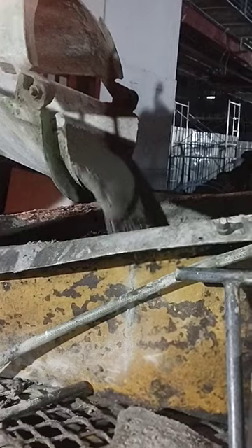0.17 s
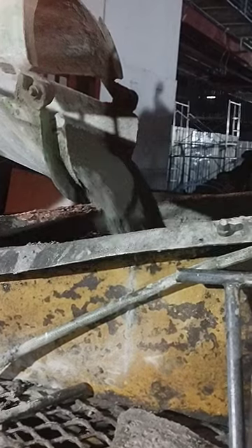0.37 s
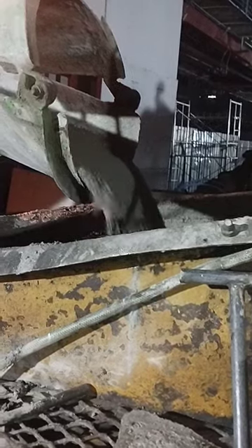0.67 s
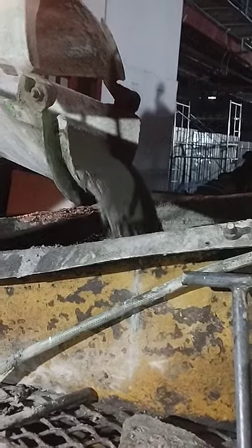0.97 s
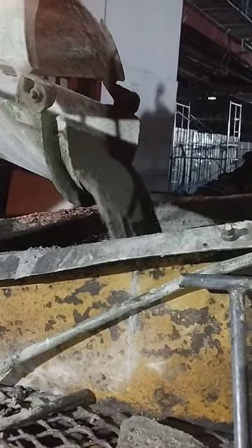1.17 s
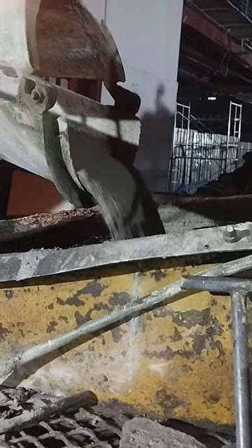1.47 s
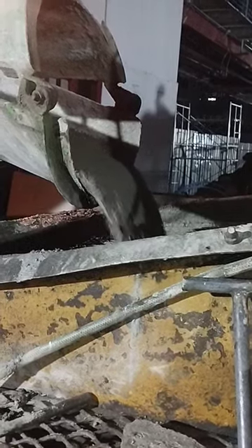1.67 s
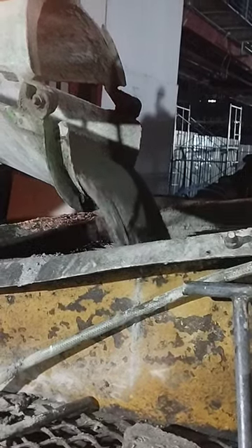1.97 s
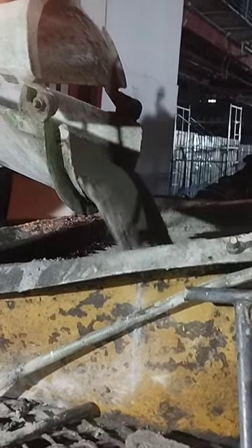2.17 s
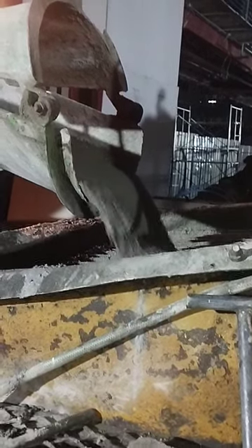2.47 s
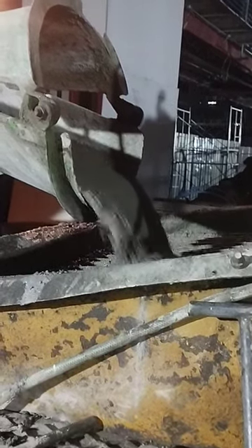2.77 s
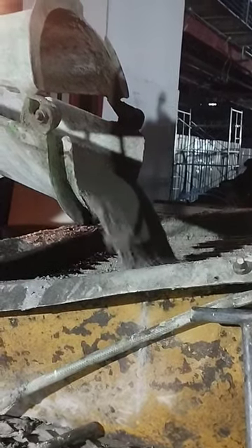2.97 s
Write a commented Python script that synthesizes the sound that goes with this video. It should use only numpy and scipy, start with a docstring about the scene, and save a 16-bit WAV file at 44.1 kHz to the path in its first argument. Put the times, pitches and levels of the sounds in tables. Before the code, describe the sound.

Loud diesel engine drone with pump hum and whine, interrupted by dull steel thuds and wet spatter.

```python
"""A loaded diesel throbs and knocks over pump hum and whine; heavy thuds break in, with wet spatter behind.
A six-cylinder diesel drives a nine-piston hydraulic pump beside a steel hopper fed with wet concrete.
Mid-way the stroke ends: load drops, the engine runs up, the valve thuds over, then pressure builds again.
Exhaust and pump are sine tones locked to the firings; knock, casing and hopper are struck ringing modes;
roar and hiss are filtered noise, slurry is dense clicks. A phone microphone holds the loud moments down."""
import sys
import numpy as np
from scipy import signal
from scipy.io import wavfile
from scipy.ndimage import uniform_filter1d

SR = 44100
rng = np.random.default_rng(int(sys.argv[2]) if len(sys.argv) > 2 else 0)


def transcribe(u):
    """Save the signal u as a 16-bit wav file named by the first command-line argument.

    u: samples, shape (n,) or (channels, n), limited to [-1, 1]; the rate is SR.
    q: integer samples, one column per channel.
    """
    v = np.clip(np.atleast_2d(u).T, -1, 1)
    q = np.round(v * 32767).astype(np.int16)
    wavfile.write(sys.argv[1], SR, q)


N = 137592
T = np.arange(N) / SR   # time [s]


def amp(db):
    """Decibels to a linear factor."""
    return 10 ** (np.asarray(db) / 20)


def rms_one(x):
    """Scale to an rms of 1."""
    return x / np.sqrt(np.mean(x ** 2) + 1e-20)


def in_time(rows):
    """Draw straight lines between timed rows, giving one curve per column."""
    s, *columns = np.transpose(rows)
    return [np.interp(T, s, c) for c in columns]


def at_hz(points, hz):
    """Read a (frequency, value) curve on a logarithmic frequency axis."""
    point_hz, values = np.transpose(points)
    return np.interp(np.log(hz), np.log(point_hz), values)


def drift(rate_hz):
    """Slow chance of spread 1: low-passed noise, made on every 40th sample."""
    r = np.exp(-80 * np.pi * rate_hz / SR)
    noise = rng.standard_normal(N // 40 + 2002)
    slow = signal.lfilter([1], [1, -2 * r, r * r], noise)[2000:]   # skip the filter's run-in
    return np.interp(np.arange(N) / 40, np.arange(len(slow)), rms_one(slow))


def ring(clicks, hz, t60):
    """A mode as a two-pole filter: a unit click starts a sine of height 1 that falls 60 dB in t60 seconds."""
    r, w = amp(-60 / (t60 * SR)), 2 * np.pi * hz / SR
    return signal.lfilter([0, np.sin(w)], [1, -2 * r * np.cos(w), r * r], clicks + 1e-18)


def push(clicks, seconds):
    """A soft contact: each click is spread over a smooth hump."""
    hump = np.hanning(int(seconds * SR))
    return signal.fftconvolve(clicks, hump / hump.sum())[:N]


def resonance(x, hz, width_hz):
    """A two-pole band-pass with about unit gain at its centre."""
    r = np.exp(-np.pi * width_hz / SR)
    return signal.lfilter((1 - r * r) / 2 * np.array([1, 0, -1]),
                          [1, -2 * r * np.cos(2 * np.pi * hz / SR), r * r], x)


def later(left, lead_rad, hz):
    """Delay the left signal by a phase lead at hz, to serve as the right."""
    return np.interp(T - lead_rad / (2 * np.pi * hz), T, left)


def firings():
    """Engine speed summed into a running count of firings, zero at the first knock."""
    first_knock_s = .331
    # firing rate as the engine runs up and settles: (time [s], rate [Hz])
    speed = [(.2, 50.7), (.85, 50.75), (1.0, 53.0), (1.2, 53.6), (1.45, 53.0), (1.65, 52.2), (1.78, 51.3),
             (2.2, 51.0), (2.6, 50.85), (3.12, 50.85)]
    count = np.cumsum(in_time(speed)[0]) / SR
    return count - np.interp(first_knock_s, T, count)


def tones(table, count, level_db):
    """Sines locked to the firings, at multiples rounded to thirds, wavering a little in level and phase."""
    waver_db, waver_rad = .5, .05   # both grow with the multiple
    out = 0
    for multiple, left_db, right_db, lead in table:
        phase = 2 * np.pi * round(3 * multiple) / 3 * count + waver_rad * multiple * drift(2.64)
        waver = waver_db * min(multiple / 2, 6) * drift(5.8)
        gain = amp(level_db + waver + np.array([[left_db], [right_db]]))
        out = out + gain * np.sqrt(2) * np.sin(phase + np.array([[lead], [0]]))
    return out


def exhaust(count, load_db):
    """Exhaust pulses: low multiples of the firing rate that follow the engine load."""
    # exhaust tones before load: (multiple of firing rate, left rms [dB], right rms [dB], left leads [rad])
    exhaust_tones = [(1, -19, -22.5, 0.54), (2, -15.5, -16.5, -0.51), (4, -26.5, -26, 0),
                     (7, -42, -33, -0.2)]
    return tones(exhaust_tones, count, load_db)


def pump(count, hum_db, whine_db):
    """Pump tones geared to the engine: a piston hum, higher piston whine and a high gear whine, with a level
    curve for the hum and one for the whines."""
    # tones before the level curves: (multiple of firing rate, left rms [dB], right rms [dB], left leads [rad])
    hum_tones = [(3, -18.5, -20.5, -0.18)]
    whine_tones = [(5.9, -21.5, -21.5, 0.21), (8.847, -24, -26, 2.5), (11.9, -27, -29.5, 0.2),
                   (49.86, -41.5, -35.5, 1.5)]
    return tones(hum_tones, count, hum_db) + tones(whine_tones, count, whine_db)


def knock(count, load_db):
    """One cylinder knocks dully, once in six firings: a soft blow into modes that swell before they die."""
    base_db, follows_load, grows_db_per_s = -4, .6, 1.2
    contact_s, swell_t60 = .00094, .012
    # knock modes: (frequency [Hz], relative level [dB], t60 [s])
    knock_modes = [(324, -3, 0.034), (427, -2, 0.026), (459, -6.5, 0.061), (297, -2, 0.047),
                   (1191, -14, 0.038), (380, -7.5, 0.031)]
    blow_db = base_db + follows_load * load_db + grows_db_per_s * (T - T.mean()) + .41 * drift(3.1)
    cycle = np.floor(count / 6)
    blows = push(np.diff(cycle, prepend=cycle[0]) * amp(blow_db), contact_s)
    out = 0
    for k, (hz, db, t60) in enumerate(knock_modes):
        mode = ring(ring(blows, hz, t60) * hz / SR, hz, swell_t60)
        out = out + (-1) ** k * amp(db) * mode * 4   # alternate signs
    return out


def casing(count, roar_db):
    """Every firing strikes the block and casing modes, with uneven timing and strength by cylinder."""
    level_db, strength_spread_db = -24.5, 1.1
    jitter_s, habit_s = .00008, .0012   # timing spread: by strike, by cylinder
    # modes: (frequency [Hz], relative level [dB], t60 [s], left minus right [dB], left leads [rad])
    casing_modes = [(741, 0, 0.17, -4, 1.), (761, 0.5, 0.099, 0, 1.4), (949, 2, 0.18, 3, 1.7),
                    (960, -4, .07, 1, 3.), (1084, -7, 0.056, 9, 3.7), (1179, 3.5, 0.12, -6, 2.27),
                    (1450, 5, 0.15, -1, 3.9), (1580, -4, 0.077, 7, 3.), (1826, 1.5, 0.14, 2.5, 2.5),
                    (2140, -2, 0.095, -12.5, 2), (702, -9, 0.05, 1, 0.39), (891, -8, 0.16, 10, 1.1),
                    (2685, -5, 0.19, -9, 1.7)]
    # strike strength of each cylinder: (relative level [dB])
    strikes_db = [6, 1, -2, -1, -3, -1]
    at = np.flatnonzero(np.diff(np.floor(count)))
    cylinder = np.floor(count[at + 1]).astype(int) % 6
    habit = rng.normal(0, 1, (6, len(casing_modes)))
    chance = rng.normal(0, 1, (len(at), len(casing_modes), 2))
    out = 0
    for k, (hz, db, t60, pan_db, lead) in enumerate(casing_modes):
        shift_s = habit_s * habit[cylinder, k] + jitter_s * chance[:, k, 0]
        place = np.clip(at + (SR * shift_s).astype(int), 0, N - 1)
        clicks = np.zeros(N)
        clicks[place] = amp(db + np.array(strikes_db)[cylinder] + strength_spread_db * chance[:, k, 1])
        left = ring(clicks, hz, t60)
        out = out + np.array([left * amp(pan_db / 2), later(left, lead, hz) * amp(-pan_db / 2)])
    return amp(level_db + roar_db - roar_db.mean()) * rms_one(out)


def valve():
    """Valve thuds: soft heavy blows into the hopper's modes, which swell before they die and judder."""
    favour_db_per_oct, swell_t60, judder_db = 19, .036, 3
    # blows: (time [s], relative level [dB], favoured pitch [Hz])
    thuds = [(.915, -6.5, 183), (.925, -14, 408), (.945, -17.5, 269), (1.068, -18.5, 425),
             (1.109, -21, 250), (1.15, -8.5, 162), (1.19, 3.5, 139), (1.201, -8, 500), (1.215, -7, 270),
             (1.279, -14.5, 320), (1.599, -19, 437)]
    # steel hopper modes: (frequency [Hz], relative level [dB], t60 [s], left leads [rad])
    hopper_modes = [(168, -1.5, 0.06, 0.12), (202, -7.5, 0.088, 0.27), (265.2, 3, 0.17, 0.58),
                    (346, -5, 0.1, 0.69), (415, -1.5, 0.1, 0.7), (505, 4, 0.043, 0.55),
                    (602, 2.5, 0.067, .5)]
    s, db, favoured_hz = np.transpose(thuds)
    out = 0
    for k, (hz, mode_db, t60, lead) in enumerate(hopper_modes):
        off_pitch_db = favour_db_per_oct * abs(np.log2(hz / favoured_hz))
        clicks = np.zeros(N)
        clicks[(s * SR).astype(int)] = amp(db + mode_db - off_pitch_db)
        swelling = ring(ring(clicks, hz, t60), hz, swell_t60) * 800 / SR
        left = (-1) ** k * swelling * amp(judder_db * drift(29))
        out = out + np.array([left, later(left, lead, hz)])
    return out


def slurry():
    """Spatter of the concrete: dense tiny clicks of grit and spray, band-passed high above the roar."""
    stones_per_s, size_db, pan_db = 9100, -.5, 6   # mean rate before drift, size step, left minus right
    # spatter level before a 1 dB cut and the pan: (time [s], rms level [dB])
    spatter = [(0.25, -41), (0.32, -41), (0.99, -39.5), (1.0, -35.5), (1.18, -35.5), (1.22, -38),
               (1.31, -30), (1.35, -40), (1.65, -36), (2.17, -40), (2.23, -36), (2.37, -43), (2.42, -39),
               (3.1, -40.5)]
    sizes = amp(size_db * np.minimum(rng.exponential(1, (2, N)), 5)) * rng.choice([-1, 1], (2, N))
    grit = sizes * (rng.random((2, N)) < stones_per_s * amp(3 * drift(25)) / SR)
    grit = signal.sosfilt(signal.butter(2, [9000, 16000], "band", fs=SR, output="sos"), grit)
    return amp(in_time(spatter)[0] - 1 + pan_db * np.array([[.5], [-.5]])) * rms_one(grit)


def roar(count, roar_db):
    """Block, fan and drum: third-octave stereo noise; its bands above 600 Hz pulse with the firings."""
    lift_db, patchy_db, firing_pulse_db = 3.67, .45, .5
    # spectrum: (frequency [Hz], relative density [dB per Hz])
    spectrum = [(25, -12), (45, -12), (75, -8.5), (130, -14), (190, -6), (235, -14.5), (330, -7.5),
                (450, -11.5), (560, -14), (640, -12.5), (800, -13), (1200, -15), (1700, -17), (2550, -22),
                (3100, -31.5), (4300, -28), (5200, -33), (6900, -30), (8500, -44.5), (13800, -55),
                (15400, -43)]
    # stereo width: (frequency [Hz], left-right likeness [-1 to 1])
    likeness = [(60, 0.78), (130, 1), (290, 0.82), (640, 0.24), (1410, -0.0048), (3100, -0.036),
                (6820, 0.013), (15000, -0.12)]
    # stereo balance: (frequency [Hz], left minus right [dB])
    sides = [(60, -3), (120, 0.5), (240, -0.5), (480, 3), (950, -0.5), (1890, -5.5), (3770, -1.5),
             (7520, -5.5), (15000, 2)]
    # swell at each cylinder's turn: (relative level [dB])
    cylinders_db = [2, 1.1, -.5, -1.1, -.8, 0]
    cylinder = np.interp(count, np.arange(6), cylinders_db, period=6)
    beat = cylinder + firing_pulse_db * np.cos(2 * np.pi * count)
    together = drift(6)
    edges = 25 * 2 ** np.arange(0, 9.4, 1 / 3)
    white = rng.standard_normal((2, 2, N))   # neighbouring bands take different noise
    out = 0
    for k, (low, high) in enumerate(zip(edges, edges[1:])):
        band = signal.butter(2, [low, high], "band", fs=SR, output="sos")
        mid, side = signal.sosfilt(band, white[k % 2])
        hz = np.sqrt(low * high)
        alike = np.clip(at_hz(likeness, hz), -.99, .99)
        patches = patchy_db * (.67 * together + drift(33))
        balance = at_hz(sides, hz) * np.array([[.5], [-.5]])
        gain = amp(at_hz(spectrum, hz) + patches + beat * (hz > 600) + balance)
        out = out + gain * (np.sqrt(1 + alike) * mid + np.sqrt(1 - alike) * side * [[1], [-1]])
    return amp(roar_db + lift_db) * rms_one(out)


def hiss(roar_db):
    """Patchy bright hiss: noise in high resonances that come and go, following the roar's level."""
    patchy_db = 3
    # resonances, each passed twice: (frequency [Hz], width of one pass [Hz], level [dB])
    hiss_bands = [(5120, 450, -38.5), (5620, 500, -40)]
    out = 0
    for hz, width, db in hiss_bands:
        band = resonance(resonance(rng.standard_normal((2, N)), hz, width), hz, width)
        out = out + amp(db + patchy_db * drift(10.5) + np.array([[-1.3], [1.3]])) * rms_one(band)
    return out * amp(roar_db - roar_db.mean())


def scene():
    """Engine, pump, hopper and concrete, all sharing one firing count and the load and roar curves."""
    # working state: (time [s], engine load [dB], pump hum [dB], pump whine [dB])
    load = [(.2, -3.5, -7, -7), (.33, -6, 1.5, 1), (.42, 0, -1, 0.5), (.65, -3.5, 0.5, -0.5),
            (.88, -4, 2, -1), (.97, -7.5, -13, -10), (1.08, -13, -2, -17), (1.17, -7, 3, -5),
            (1.3, -10, -6, -2), (1.42, -11, -6.5, -4.5), (1.52, -9, 5, 4), (1.65, -7.5, -10, -0.5),
            (1.78, -2, 1.5, 3), (2.0, -4.5, -2, 1.5), (2.3, -2, -2, 1), (2.6, -2.5, -2, -3),
            (2.9, -2.5, -1.5, -1), (3.12, -3, 0, -2)]
    # roar level before its lift: (time [s], rms level [dB])
    roar_level = [(0.25, -17.5), (0.26, -19.5), (0.3, -18), (0.9, -17), (0.96, -20.5), (1.18, -15),
                  (1.22, -17), (1.3, -14.5), (1.38, -20.5), (1.39, -17), (3.01, -18.5), (3.1, -19)]
    count = firings()
    load_db, hum_db, whine_db = in_time(load)
    roar_db = in_time(roar_level)[0]
    engine = exhaust(count, load_db) + knock(count, load_db) + casing(count, roar_db)
    background = slurry() + roar(count, roar_db) + hiss(roar_db)
    return engine + pump(count, hum_db, whine_db) + valve() + background


def record(dry):
    """Microphone: treble dips, a low cut that lifts, gain control, fade-in, rounded peaks and a cut top."""
    start_s, fade_s = .2275, .014   # silence, then the fade-in
    bass_opens_s, bass_cut_hz = .39, 105
    hold_db, cut_db_per_db, release_db_per_s, glide_s = -11, .6, 50, .014
    ceiling, cutoff_hz = 1.14, 15500
    # treble dips: (frequency [Hz], width [Hz], depth [0-1])
    mic_dips = [(7870, 1000, 1), (10920, 1500, 0.52)]
    # soft bump as the low cut lifts, left then right: (height [linear], fade time constant [s])
    bump = [(0.063, 0.15), (-0.1, .03)]
    for hz, width, depth in mic_dips:
        dry = dry - depth * resonance(dry, hz, width)

    thin = signal.sosfilt(signal.butter(2, bass_cut_hz, "high", fs=SR, output="sos"), dry)
    since = np.maximum(T - bass_opens_s, 0)
    opened = 1 - np.exp(-since / .006)
    x = thin + opened * (dry - thin)

    power = uniform_filter1d(np.mean(x ** 2, axis=0), size=800)
    level_db = 10 * np.log10(power + 1e-9)
    # the held level jumps up with peaks and falls at the release rate
    held_db = np.maximum.accumulate(level_db + release_db_per_s * T) - release_db_per_s * T
    cut_db = -cut_db_per_db * np.maximum(held_db - hold_db, 0)
    r = np.exp(-1 / (glide_s * SR))
    x = x * amp(signal.lfilter([1 - r], [1, -r], cut_db))

    x = x + opened * np.array([height * np.exp(-since / s) for height, s in bump])
    fade = np.clip((T - start_s) / fade_s, 0, 1)
    x = np.tanh(x * fade / ceiling) * ceiling
    return signal.sosfilt(signal.ellip(10, .5, 70, cutoff_hz, fs=SR, output="sos"), x)


dry = scene()
out = record(dry)
transcribe(out)
```